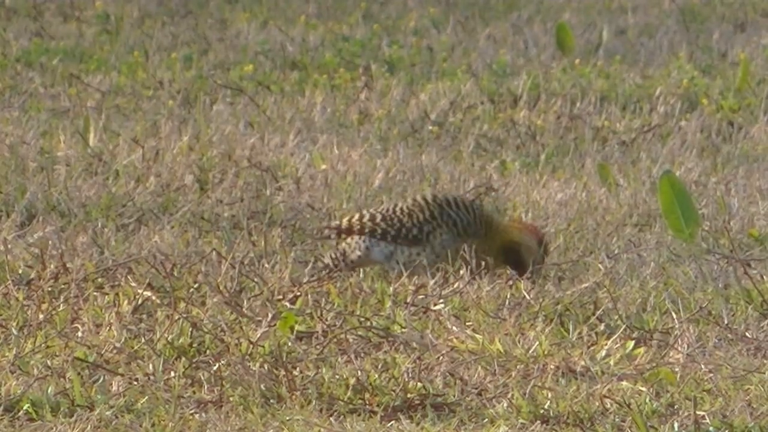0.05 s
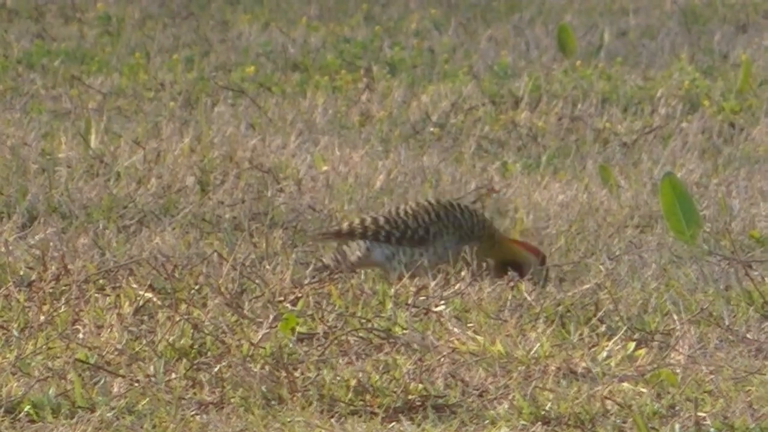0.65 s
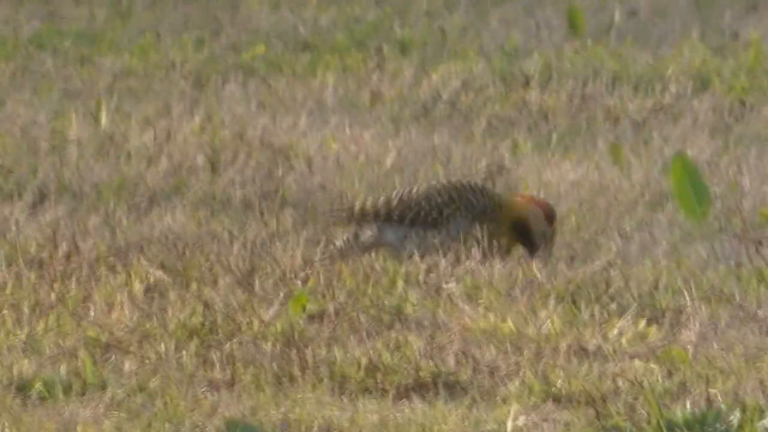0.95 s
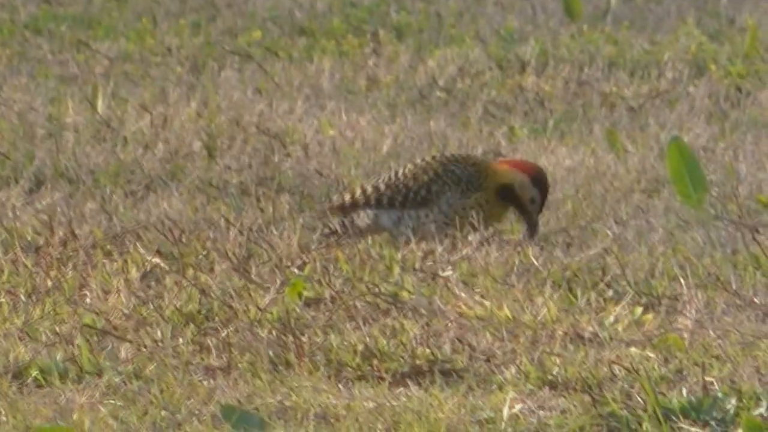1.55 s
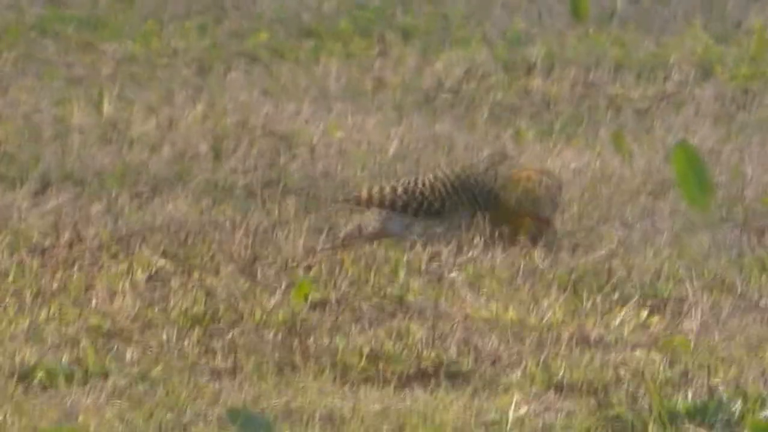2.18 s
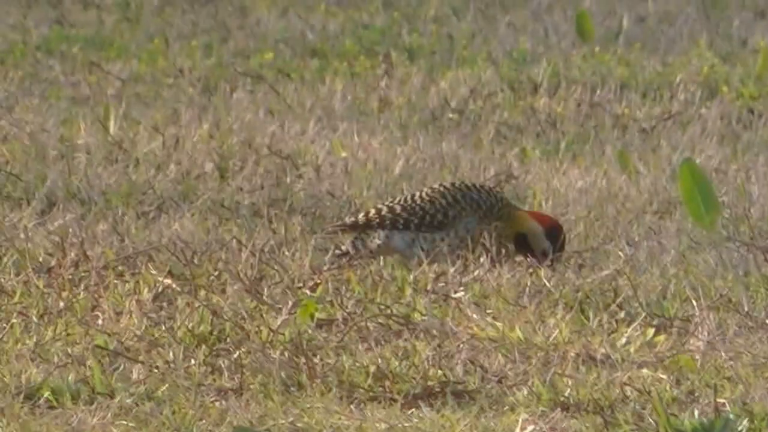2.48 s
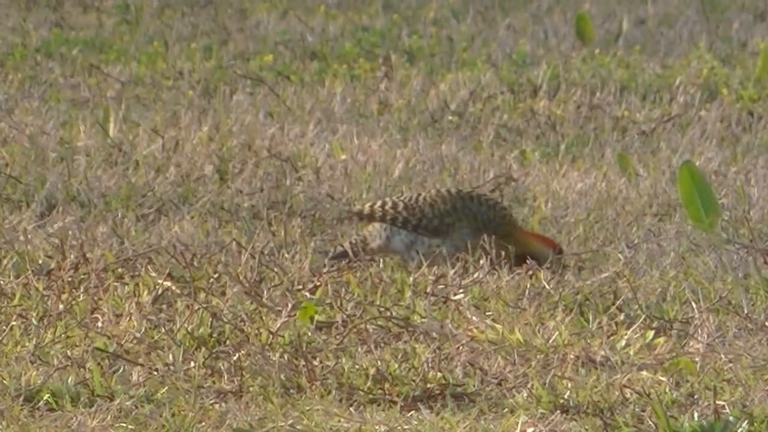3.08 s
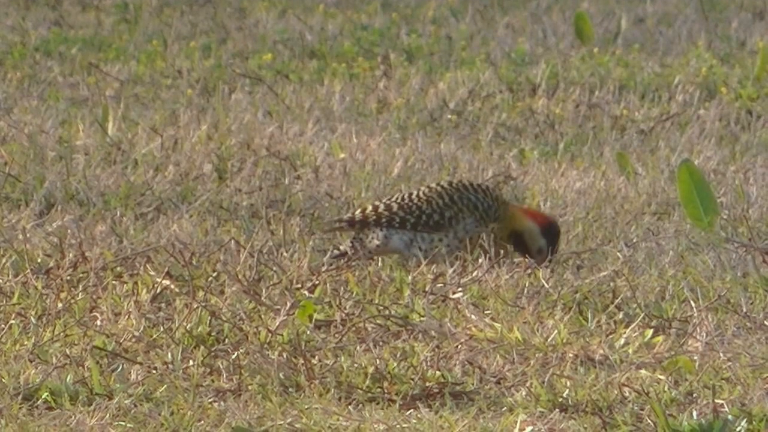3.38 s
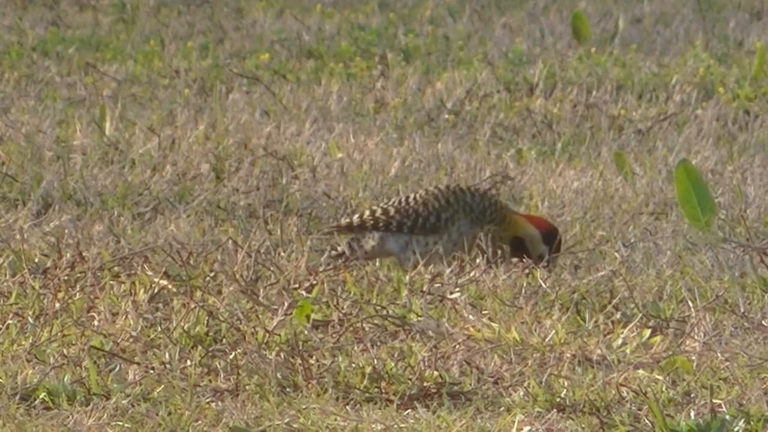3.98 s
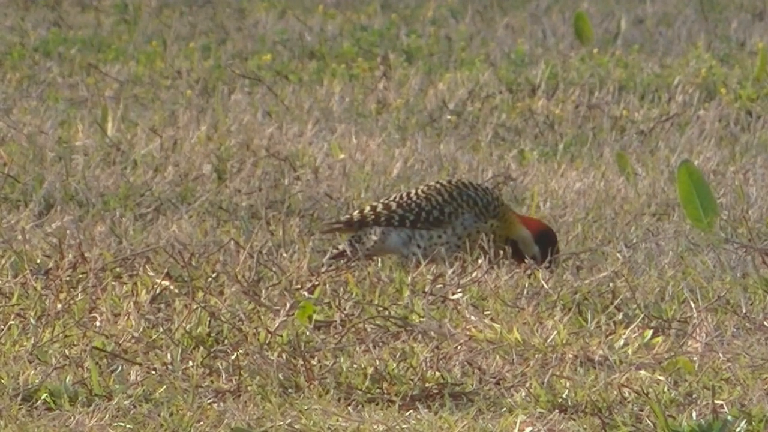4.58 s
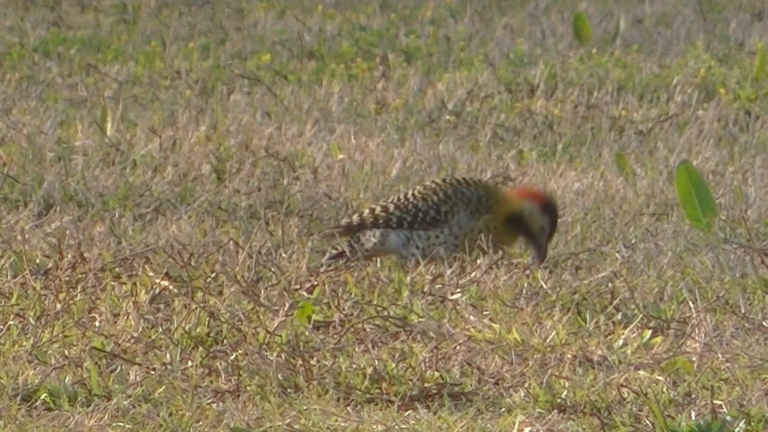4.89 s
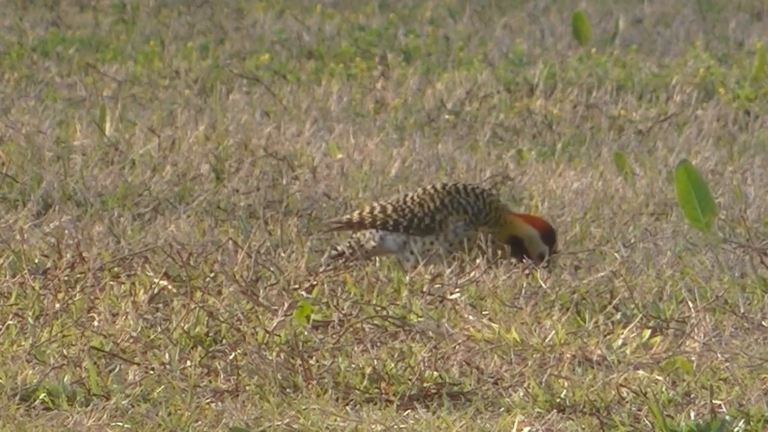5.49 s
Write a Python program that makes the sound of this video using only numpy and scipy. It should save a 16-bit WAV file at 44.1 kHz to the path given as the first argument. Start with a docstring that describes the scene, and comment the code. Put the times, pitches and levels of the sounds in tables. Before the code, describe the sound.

In open grassland with a quiet breeze, several birds call over one another in a fast, even series of short nasal notes. Harsh squawks cut in, and a nearer small bird whistles thin, sweeping chirps, with a couple of dry ticks among them. The calling thins out in the second half. Soft low knocks bump the microphone now and then, with the two hardest coming late.

```python
"""Open grassland with a quiet breeze. From the start, birds call over one another in short nasal notes,
each a rasp clearing into a falling tone: two keep an even beat, higher notes answer, a far flock fades.
Distant trees echo the birds faintly. From 0.4 s the camera takes soft bumps, hardest at 4.1 and 5.5 s.
From 1.7 s harsh pulsed squawks cut in and a nearer small bird whistles thin sweeping chirps.
Dry ticks follow at 2.2 and 3.5 s, then one faint climbing warble at 3.8 s."""
import sys
import numpy as np
from scipy import signal
from scipy.fft import rfft, irfft, next_fast_len
from scipy.io import wavfile
from scipy.ndimage import map_coordinates

SR = 44100
rng = np.random.default_rng(int(sys.argv[2]) if len(sys.argv) > 2 else 0)


def wav_record(signal):
    """Record a signal, one row per channel, as 16-bit PCM in the file named by sys.argv[1]."""
    frames = np.transpose(np.atleast_2d(signal))
    bounded = np.clip(frames, -1, 1)
    # unit amplitude maps onto the largest positive 16-bit level
    quanta = np.round(bounded * 32767).astype(np.int16)
    wavfile.write(sys.argv[1], SR, quanta)


N = 249165

# breeze spectrum: (frequency [Hz], density [dB])
BREEZE_SPECTRUM = [(25, -20), (100, -6), (300, -0.5), (700, -0.5), (1100, -3), (1600, 3.5), (3200, 1),
                   (5500, -7.5), (7500, -8), (10000, -12.5), (15000, -25.5)]
# diffuse sound: (frequency [Hz], left-right correlation [0-1])
COHERENCE = [(60, 0.037), (250, 0.028), (1000, 0.5), (5000, 0.52), (12000, 1)]
# nasal harmonics 5-10: (frequency [Hz], level re 4th harmonic [dB])
OVERTONES = [(4400, -62), (5500, -5.5), (6600, -15), (7700, -26.5), (12000, -32.5)]
# throat response in a rasp: (frequency [Hz], gain [dB])
RASP_THROAT = [(500, -23), (1500, -9.5), (2200, -4), (2700, 12), (3200, 2.5), (4300, 1), (5500, -51),
               (7000, -20), (15000, -34)]
# drift of the two even callers:
# (time [s], top pitch [Hz], length [s], 3rd harmonic level [dB], 2nd re 3rd [dB])
LOW_CALLER = [(.061, 1116, 0.067, -35.5, 4), (.235, 1126, .066, -35, 3.5), (.42, 1103, 0.042, -37, 5),
              (.595, 1106, 0.037, -37, 2.5), (.722, 1093, .042, -32, 0.5), (.919, 1098, .032, -31.5, -1),
              (1.233, 1110, 0.052, -31, 3.5), (1.545, 1120, 0.047, -32, 0.5),
              (1.89, 1109, 0.037, -29.5, -3.5), (2.068, 1113, .036, -34.5, 0.5),
              (2.25, 1097, 0.042, -45, 2), (2.43, 1102, 0.0598, -38, 4), (2.764, 1098, 0.064, -34.5, -4.5),
              (3.415, 1080, 0.0555, -36.5, -9), (3.911, 1084, 0.04, -37, -7.5),
              (4.41, 1083, 0.071, -39.5, -4), (4.905, 1083, 0.044, -40, -1.5),
              (5.567, 1083, 0.04, -39.5, -5)]
MIDDLE_CALLER = [(.799, 1120, 0.074, -40, 4.5), (1.135, 1115, 0.044, -36.5, 0.5),
                 (1.479, 1091, 0.042, -33.5, 1.5), (1.645, 1097, 0.045, -36, 4),
                 (1.806, 1099, 0.0475, -32, 2.5), (1.964, 1100, 0.05, -33.5, 0.5),
                 (2.38, 1156, 0.05, -34.5, 2), (2.712, 1158, 0.049, -32.5, -4.5),
                 (3.213, 1159, 0.031, -32, -5.5), (3.54, 1143, 0.039, -33.5, -18),
                 (3.878, 1148, 0.045, -34.5, -4), (4.047, 1149, 0.0613, -36.5, -2.5),
                 (4.38, 1147, 0.0505, -36.5, 2), (4.553, 1106, .07, -39.5, 1),
                 (4.709, 1123, 0.048, -43.5, 2), (5.033, 1113, 0.045, -39, -9),
                 (5.195, 1151, 0.053, -34, -8.5), (5.537, 1143, 0.046, -40, -13)]
# 4th harmonic of both callers: (time [s], level re 3rd [dB])
FOURTH_HARMONIC = [(0, -8), (.42, -10), (.73, -2), (1.55, -1.5), (2.1, -3), (3.6, -4), (4.3, -4.5),
                   (5.6, -3.5)]
# higher answering notes: (time [s], length [s], top pitch [Hz], 2nd harmonic level [dB])
ANSWERS = [(0, 0.037, 1195, -28), (0.177, 0.049, 1230, -30.5), (0.311, 0.037, 1189, -32.5),
           (0.45, 0.056, 1246, -31.5), (0.514, 0.063, 1180, -33.5), (0.624, .04, 1187, -32),
           (0.755, 0.042, 1216, -29.5), (0.946, 0.069, 1172, -33), (1.04, 0.028, 1240, -30),
           (1.317, 0.047, 1218, -26.5), (1.381, 0.028, 1182, -33.5), (1.61, 0.079, 1213, -23),
           (1.883, .062, 1222, -28), (2.143, 0.082, 1215, -31), (4.129, 0.031, 1154, -44.5),
           (4.333, .06, 1180, -43), (4.761, 0.065, 1202, -41.5), (4.993, 0.027, 1188, -40.5),
           (5.482, 0.029, 1217, -37.5)]
# soft answers rasp less: (note level [dB], relative rasp level [dB])
ANSWER_RASP = [(-43, -13), (-34.5, -10), (-32.5, -1), (-17, -3.5)]
# far callers: (time [s], level [dB])
FLOCK_LEVEL = [(0, -43), (1.8, -40), (3.4, -46), (4, -52), (5.6, -53)]
# tree echo decay: (frequency [Hz], T60 [s])
TREE_DECAY = [(300, 0.053), (3000, 0.62), (9000, 0.51)]
# knocks on the camera: (time [s], level [dB], frequency [Hz])
BUMPS = [(.433, -40, 232), (1.263, -40.5, 175.7), (1.994, -38.5, 310), (2.067, -36, 214),
         (2.459, -36.5, 207), (4.007, -25, 109), (4.058, -13.5, 124), (4.128, -21, 138), (4.145, -24, 170),
         (4.191, -26, 127), (4.715, -30, 139), (5.503, -29, 110), (5.514, -12, 160), (5.544, -23, 140)]
# capsule phase gap in a knock: (level [dB], left-right gap [rad])
BUMP_PHASE = [(-36, 0.41), (-32.5, 2), (-27, 2.63)]
# squawks: (time [s], length [s], pulse rate [Hz], start pitch [Hz], end pitch [Hz],
# mid-call level [dB], swell [dB], roughness [0-1])
SQUAWKS = [(1.673, .184, 43.7, 1432, 1541, -27.5, 0, .58),
           (2.208, .182, 43.4, 1424, 1753, -19.5, 7.5, 0.43),
           (3.12, .196, 43.6, 1414, 1357, -31.5, -0.5, 0.71), (3.498, .19, 47.4, 1398, 1487, -24, 3, 0.61),
           (5.132, .164, 45, 1420, 1543, -30.5, 3.5, .75)]
# throat response in a squawk: (frequency [Hz], gain [dB])
SQUAWK_THROAT = [(500, 0.5), (1600, -23.5), (2300, -2), (3100, 1), (3900, -1.5), (4800, -1.5), (5700, -8),
                 (6900, -12), (9000, -19.5), (12000, -34.5), (15500, -50)]
# chirps: (time of top [s], rise [s], fall [s], top pitch [Hz], end pitch [Hz], level [dB],
# lateness of the fall [exponent])
CHIRPS = [(1.743, 0.0023, 0.014, 5160, 4340, -26, 0.75), (1.768, 0.0023, .012, 5220, 4500, -33, 0.92),
          (1.791, 0.0023, .011, 5010, 4500, -27, 0.75), (2.018, .013, .008, 8040, 7900, -32.5, 1),
          (2.036, 0.0024, 0.019, 5700, 5000, -30.5, .5), (2.08, 0.0055, 0.02, 6120, 6130, -25.5, 1.4),
          (2.338, .003, 0.043, 7340, 5850, -23.5, 0.86), (2.44, 0.019, .026, 9540, 7200, -20, 0.98),
          (2.652, .004, 0.043, 7350, 5230, -17.5, .72), (2.733, 0.029, 0.042, 6150, 3550, -17, 1.84),
          (3.011, 0.011, 0.037, 8870, 6100, -14, .92), (3.101, .011, 0.031, 8010, 6060, -17, 1.1),
          (3.143, 0.0019, 0.03, 5400, 3700, -23.5, 0.61), (3.358, .006, 0.055, 7170, 3400, -18, 0.98),
          (3.459, 0.0095, 0.051, 6940, 3480, -17.5, 0.94), (4.425, 0.0018, .035, 5500, 4500, -43, 1),
          (4.49, 0.0017, 0.052, 5600, 4000, -44, 1.1), (5.45, 0.0017, 0.0237, 4560, 3760, -35, 1.05),
          (5.51, 0.046, 0.0037, 5300, 5300, -44, 1)]
# chirps are loudest in mid-range: (pitch [Hz], gain [dB])
WHISTLE_RANGE = [(3400, -6.5), (4700, -1.5), (7000, -0.5), (8100, -4), (8700, -10), (9800, -11)]
# dry ticks: (time [s], level [dB])
TICKS = [(2.1927, -25.5), (3.522, -40)]


def amp(db):
    """Decibels to gain."""
    return 10 ** (np.asarray(db) / 20)


def unit(x):
    """Scale to rms 1."""
    return x / np.sqrt(np.mean(x ** 2) + 1e-20)


def lookup(points, x):
    """(x, value) points read on a linear axis."""
    return np.interp(x, *np.transpose(points))


def along(points, hz):
    """(Hz, value) points read on a log axis."""
    knots_hz, values = np.transpose(points)
    return np.interp(np.log(hz + 1), np.log(knots_hz), values)


def filtered(x, response):
    """Apply a frequency response."""
    n = x.shape[-1]
    size = next_fast_len(n + 2048)
    return irfft(rfft(x, size) * response(np.fft.rfftfreq(size, 1 / SR)), size)[..., :n]


def coloured(x, curve):
    """Filter by a (Hz, dB) curve, then scale to rms 1."""
    return unit(filtered(x, lambda hz: amp(along(curve, hz))))


def wobble(n, rate_hz):
    """Smooth random curve, n samples."""
    knots = rng.standard_normal(int(n * rate_hz / SR) + 4)
    return map_coordinates(knots, [np.arange(n) * rate_hz / SR])


def clock(length_s):
    """Sample times."""
    return np.arange(int(length_s * SR)) / SR


def gate(t, length, rise, fall):
    """Smooth opening at 0, closing at length."""
    return np.sin(np.pi / 2 * np.clip(np.minimum(t / rise, (length - t) / fall), 0, 1)) ** 2


def add(track, at_s, x):
    """Mix x into the track."""
    i = round(at_s * SR)
    x = x[max(-i, 0):max(N - i, 0)]
    track[max(i, 0):][:len(x)] += x


def spread(pair):
    """Two independent signals to stereo, more alike in the treble."""
    def weights(hz):
        angle = np.arccos(np.clip(along(COHERENCE, hz), -1, 1)) / 2
        return np.array([np.cos(angle), np.sin(angle)])
    mid, side = filtered(pair, weights)
    return np.array([mid + side, mid - side])


def breeze():
    """Steady hush of the field; the rumble leans right."""
    air = coloured(spread(rng.standard_normal((2, N))), BREEZE_SPECTRUM)
    air = filtered(air, lambda hz: amp(np.outer([-1, 1], along([(150, 0.77), (1200, 0.3)], hz))))
    sway = amp(0.5 * wobble(N, 4))
    return amp(-43.5) * air * sway


def nasal(pitch_hz, second_db, third_db, fourth_db):
    """Harmonic voice, weak fundamental; brighter when the bird pushes its pitch up."""
    top_hz = pitch_hz.max()
    effort_db = 8 * np.clip((top_hz - 1130) / 80, 0, 1)
    levels_db = [max(second_db - 20, third_db - 14), second_db, third_db, fourth_db]
    levels_db += [fourth_db + effort_db * (k == 5) + along(OVERTONES, k * top_hz) for k in range(5, 11)]
    phase = 2 * np.pi * np.cumsum(pitch_hz) / SR
    voice = np.zeros(len(phase))
    for k, db in enumerate(levels_db, 1):
        voice += amp(db + wobble(len(phase), 80)) * np.sin(k * phase + rng.uniform(0, 2 * np.pi))
    return np.sqrt(2) * voice


def buzz(pitch_hz, jitter, jitter_hz, throat):
    """Unsteady syrinx: harmonics of a trembling pitch, shaped by the throat."""
    phase = 2 * np.pi * np.cumsum(pitch_hz * (1 + jitter * wobble(len(pitch_hz), jitter_hz))) / SR
    return coloured(sum(np.cos(k * phase) for k in range(1, 10)), throat)


def rasp(pitch_hz, levels_db, length_s, start_rate_hz=105):
    """Stuttering onset: bursts of voice quicken and run together."""
    t = clock(length_s)
    u = t / length_s
    rate_hz = start_rate_hz * np.exp(0.198 * wobble(len(t), 89)) * (1 + 0.5 * u)
    cycle = np.cumsum(rate_hz) / SR % 1
    bursts = amp(-8.5 * cycle * (1 - u)) * gate(cycle, 0.95, 0.11, 0.13)
    voice = unit(nasal(pitch_hz * (0.975 + 0.025 * wobble(len(t), 443)), *levels_db))
    grit = buzz(np.full(len(t), pitch_hz), jitter=0.089, jitter_hz=900, throat=RASP_THROAT)
    return unit((voice + 0.9 * grit) * bursts) * amp(1.1 * (u - 1)) * gate(t, length_s, 0.0014, 0.01)


def note(track, at_s, length_s, top_hz, levels_db, rasp_db, rise_s, sag_hz_per_s):
    """Add a rasp clearing into a tone that sags and fades as air runs out; high notes rasp longer."""
    tail_s, fade_db = 0.011, 6.5
    t = clock(rise_s + length_s + tail_s)
    u = np.maximum(t - rise_s, 0) / length_s
    scoop = 1 - 0.035 * np.exp(-t / rise_s)
    sag_hz = sag_hz_per_s * length_s * (0.3 * u + 0.7 * u ** 2.5)
    pitch_hz = (top_hz - sag_hz) * scoop * (1 + 0.005 * wobble(len(t), 450))
    envelope = amp(2.5 - fade_db * u ** 3) * gate(t, t[-1], rise_s + 0.011, tail_s / 2)
    add(track, at_s - rise_s, nasal(pitch_hz, *levels_db) * envelope)
    stutter_s = np.interp(top_hz, [1160, 1210], [0.024, 0.045])
    add(track, at_s - stutter_s, amp(rasp_db + 2.5) * rasp(top_hz, levels_db, stutter_s + 0.012))


def series(drift, gap_s=0.166):
    """Interpolate a drift table to one row per beat, about gap_s apart."""
    columns = np.transpose(drift)
    times_s = columns[0]
    beats = np.cumsum(np.round(np.diff(times_s, prepend=times_s[0]) / gap_s))
    return zip(*(np.interp(np.arange(beats[-1] + 1), beats, column) for column in columns))


def even_callers():
    """Two birds, each at about six nasal notes a second."""
    out = np.zeros(N)
    for at_s, top_hz, length_s, db, second_db in [*series(LOW_CALLER), *series(MIDDLE_CALLER)]:
        levels_db = db + second_db, db, db + lookup(FOURTH_HARMONIC, at_s)
        note(out, at_s, length_s, top_hz, levels_db, rasp_db=db + 1.47, rise_s=0.007, sag_hz_per_s=2134)
    return out


def answers():
    """Higher, less regular notes with a slower arch."""
    out = np.zeros(N)
    for at_s, length_s, top_hz, db in ANSWERS:
        levels_db = db, db - 9, db - 11.5
        rasp_db = db + lookup(ANSWER_RASP, db)
        note(out, at_s, length_s, top_hz, levels_db, rasp_db, rise_s=0.016, sag_hz_per_s=1600)
    return out


def flock(count=52):
    """Birds of the same kind, farther off, slowly falling quiet."""
    out, t = np.zeros(N), clock(0.09)
    u = t / t[-1]
    envelope = gate(t, t[-1], 0.012, 0.025)
    for i, (offset, height) in enumerate(rng.random((count, 2))):
        at_s = (i + offset - 1) / count * N / SR
        tremble = 1 + 0.0373 * (1 - u) ** 2 * wobble(len(t), 486)
        pitch_hz = (1030 + 140 * height) * (1 - 0.1234 * u ** 2) * tremble
        add(out, at_s, amp(lookup(FLOCK_LEVEL, at_s)) * nasal(pitch_hz, -1, -2, -2) * envelope)
    return out


def tree_echo(x, delay_samples=130):
    """Thin scatter from the ground and far trees."""
    hz, t, noise = signal.stft(rng.standard_normal((2, SR // 2)), SR, nperseg=256)
    decay = amp(-60 * t / along(TREE_DECAY, hz)[:, None])
    tail = spread(signal.istft(noise * decay, SR, nperseg=256)[1])
    tail /= np.linalg.norm(tail[0])
    return signal.fftconvolve(np.pad(x, (delay_samples, 0))[None], tail, axes=1)[:, :N]


def bumps(rock_t60_s=0.026, shudder_t60_s=0.33):
    """Soft knocks rock the camera a cycle or two; harder ones drive its capsules in opposition."""
    out, t = np.zeros((2, N)), clock(0.133)
    spectrum = [(35, -35), (90, 7), (220, -3), (500, -26), (2000, -45)]
    rock_envelope = gate(t, t[-1], 0.0042, 0.01) * amp(8 - 60 * t / rock_t60_s)
    shudder_envelope = gate(t, t[-1], 0.0037, 0.0092) * amp(-19 - 60 * t / shudder_t60_s)
    for at_s, db, hz in BUMPS:
        shudder = coloured(rng.standard_normal(len(t)), spectrum) * shudder_envelope
        for track, shift_rad, side_db in zip(out, (lookup(BUMP_PHASE, db), 0), (-4, 1)):
            rock = np.sin(2 * np.pi * hz * t + shift_rad) * rock_envelope
            add(track, at_s, amp(db + side_db) * (rock + np.cos(shift_rad) * shudder))
    return out


def squawks(pulse_s=0.022, arch=0.0694):
    """Harsh pulsed calls, lifting mid-call; each pulse bends upward and crackles when rough."""
    out, t = np.zeros(N), clock(pulse_s)
    bend = 1 + 0.13 * (t / pulse_s - 0.35) ** 2
    envelope = gate(t, pulse_s, 0.0014, 0.0069)
    for at_s, length_s, rate_hz, start_hz, end_hz, db, swell_db, roughness in SQUAWKS:
        for k, u in enumerate(np.linspace(0, 1, round(length_s * rate_hz))):
            effort = 4 * u * (1 - u)
            pitch_hz = (start_hz + (end_hz - start_hz) * u) * (1 + arch * effort)
            voice = buzz(pitch_hz * bend, jitter=0.164 * roughness, jitter_hz=1600, throat=SQUAWK_THROAT)
            crackle = amp(2.5 * roughness * wobble(len(t), 700))
            pulse = unit(voice * crackle) * envelope
            add(out, at_s + k / rate_hz - 0.001, amp(db - swell_db * (1 - effort)) * pulse)
    return out


def whistle(t, pitch_hz, db):
    """Nearly pure tone, slight tremble."""
    phase = 2 * np.pi * np.cumsum(pitch_hz * (1 + 0.012 * wobble(len(t), 680))) / SR
    envelope = amp(db + 2.4 * wobble(len(t), 243)) * gate(t, t[-1], 0.00084, 0.0025)
    return np.sqrt(2) * envelope * (np.sin(phase) + amp(-40) * np.sin(2 * phase))


def chirps(scoop=0.12, swell_db_per_s=348, fade_db=8.5):
    """Small bird: each whistle scoops up to its top, then glides to its end pitch and fades."""
    out = np.zeros(N)
    for at_s, rise_s, fall_s, top_hz, end_hz, db, lateness in CHIRPS:
        t = clock(rise_s + fall_s + 0.0033)
        before = np.clip(1 - t / rise_s, 0, 1)
        after = np.clip((t - rise_s) / fall_s, 0, 1)
        u = after ** lateness
        dive = (u + np.sin(np.pi / 2 * u) ** 2) / 2
        pitch_hz = top_hz * (1 - scoop * before ** 1.6) + (end_hz - top_hz) * dive
        envelope_db = -swell_db_per_s * rise_s * before - fade_db * after ** 2.8
        add(out, at_s - rise_s, whistle(t, pitch_hz, db + along(WHISTLE_RANGE, pitch_hz) + envelope_db))
    return out


def ticks(t60_s=0.011):
    """Tiny dry snaps of noise."""
    out, t = np.zeros(N), clock(0.012)
    spectrum = [(100, -45), (300, -29), (2000, -2), (4500, -3), (9000, -20), (15000, -37)]
    for at_s, db in TICKS:
        snap = coloured(rng.standard_normal(len(t)), spectrum)
        add(out, at_s, snap * amp(db + 11.5 - 60 * t / t60_s))
    return out


def warble(at_s=3.812, base_hz=3400, climb_hz_per_s=16000, rate_hz=46, depth_hz=480, fade_db_per_s=45):
    """One faint whistle climbing with fast, wide vibrato."""
    out, t = np.zeros(N), clock(0.1)
    swing = -np.cos(2 * np.pi * rate_hz * t)
    pitch_hz = base_hz + climb_hz_per_s * t + depth_hz * swing
    add(out, at_s, whistle(t, pitch_hz, -34.5 - fade_db_per_s * t + 2 * swing))
    return out


def scene(lag_s=1.4e-5):
    """Stereo mix; all birds nearly straight ahead."""
    calls = even_callers() + answers() + flock()
    harsh = squawks()
    whistles = chirps() + warble()
    # callers stand slightly right: that capsule hears them first
    placed = filtered(calls, lambda hz: np.exp(np.outer([-1, 1], 1j * np.pi * hz * lag_s)))
    direct = placed * amp([[0.3], [-0.3]]) + harsh + whistles + ticks()
    echo = tree_echo(amp(-9) * (calls + harsh) + amp(-14) * whistles)
    return direct + echo + bumps() + breeze()


def record(dry):
    """Camera response: low rumble thinned, hard band limit."""
    limit_hz = 15700
    return filtered(dry, lambda hz: (hz < limit_hz) * amp(along([(25, -16), (65, 0)], hz)))


dry = scene()
out = record(dry)
wav_record(out)
```